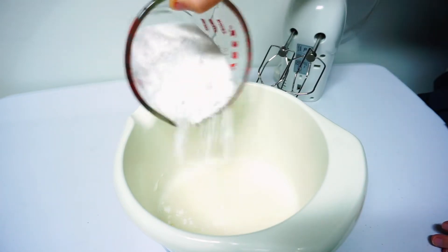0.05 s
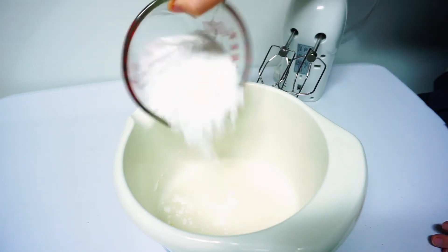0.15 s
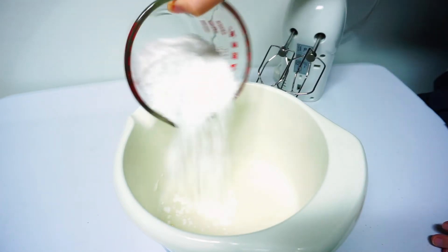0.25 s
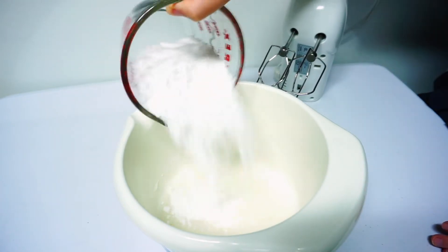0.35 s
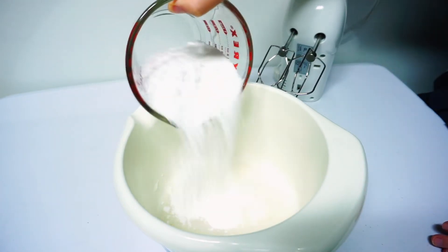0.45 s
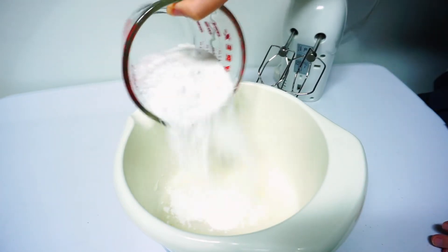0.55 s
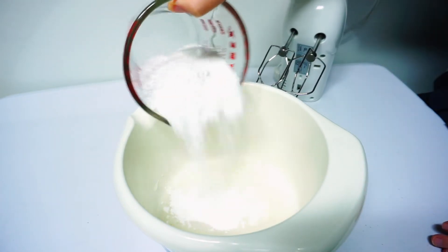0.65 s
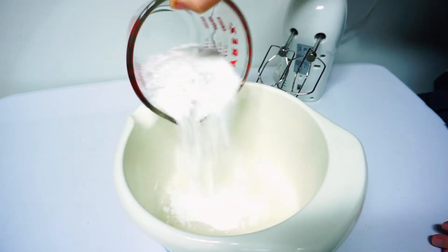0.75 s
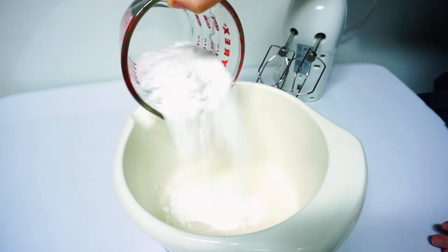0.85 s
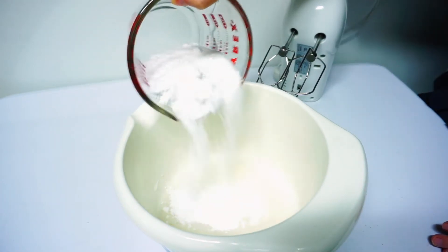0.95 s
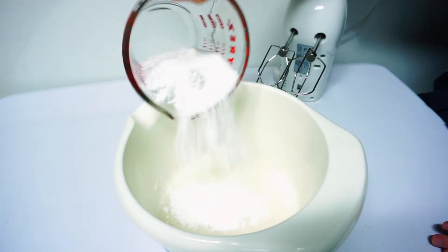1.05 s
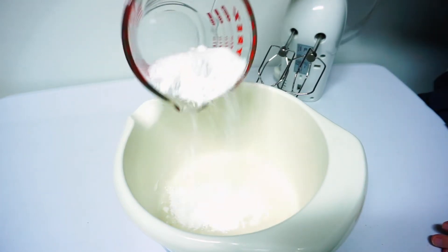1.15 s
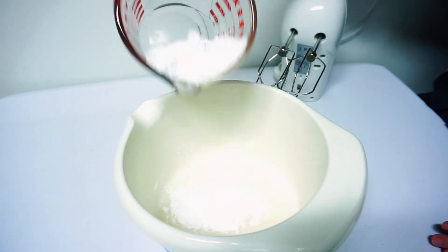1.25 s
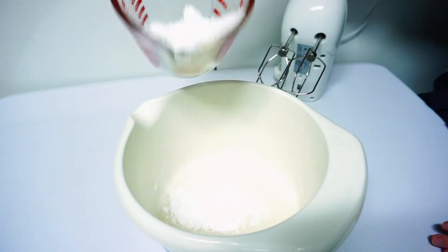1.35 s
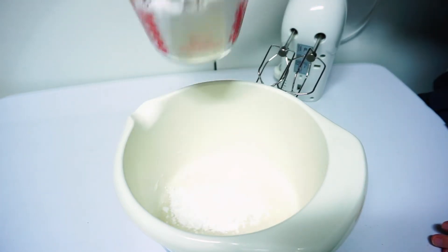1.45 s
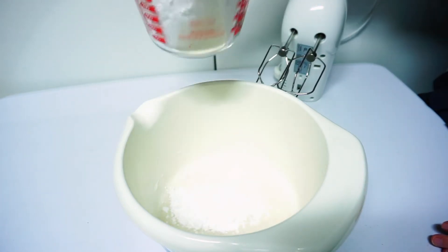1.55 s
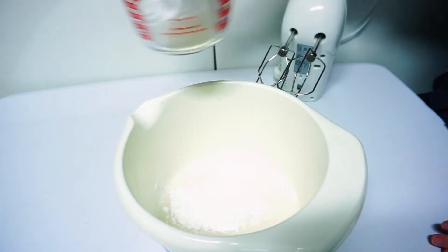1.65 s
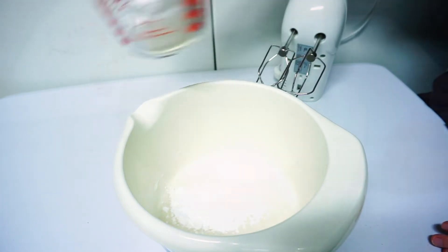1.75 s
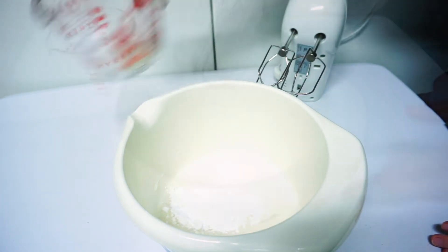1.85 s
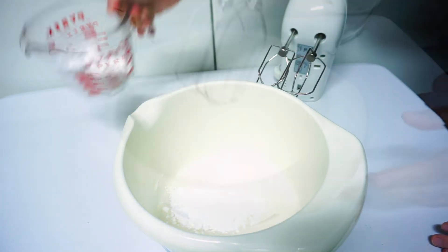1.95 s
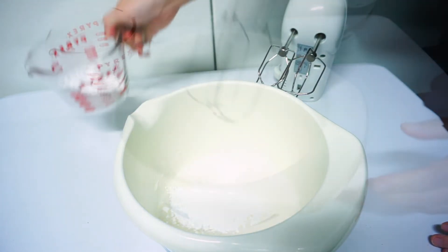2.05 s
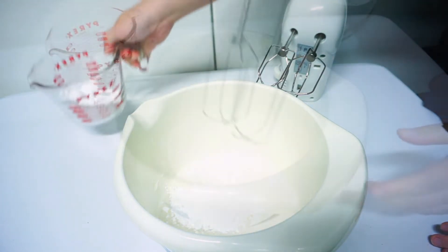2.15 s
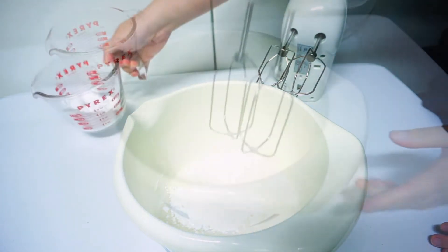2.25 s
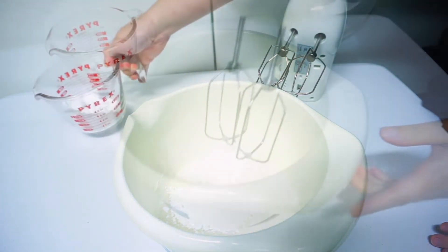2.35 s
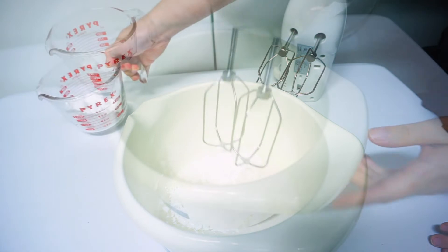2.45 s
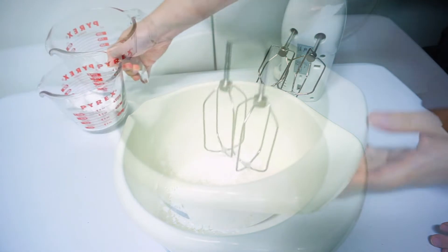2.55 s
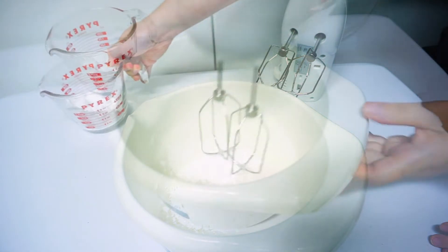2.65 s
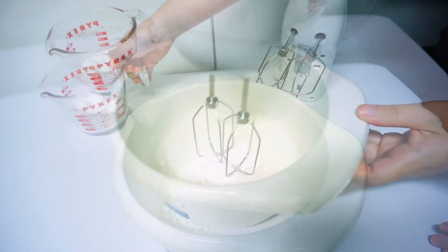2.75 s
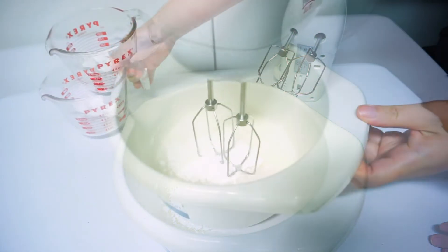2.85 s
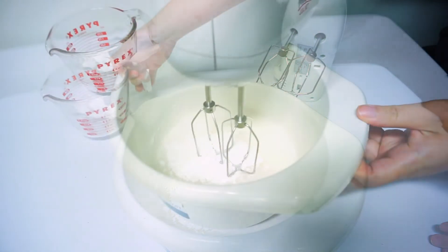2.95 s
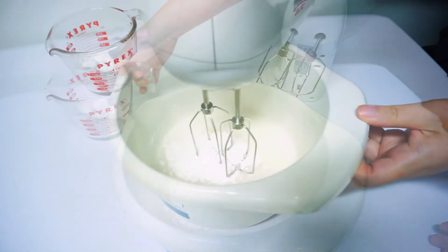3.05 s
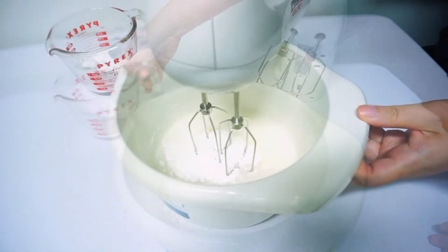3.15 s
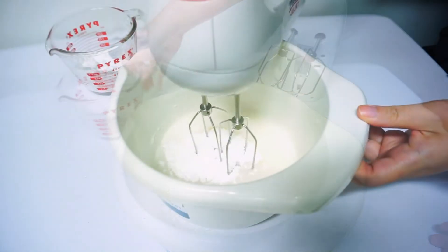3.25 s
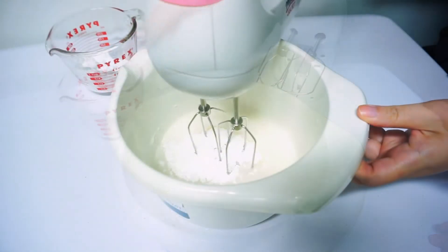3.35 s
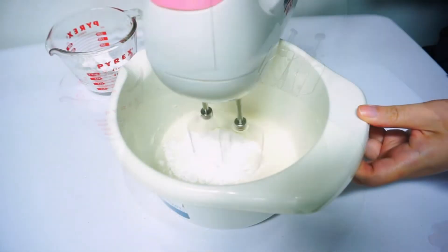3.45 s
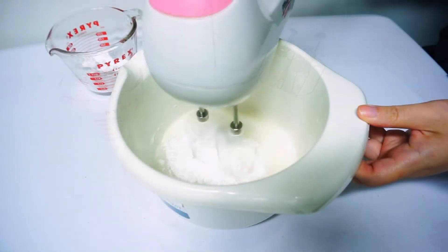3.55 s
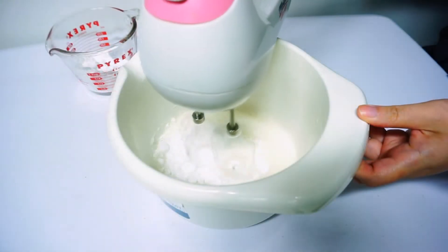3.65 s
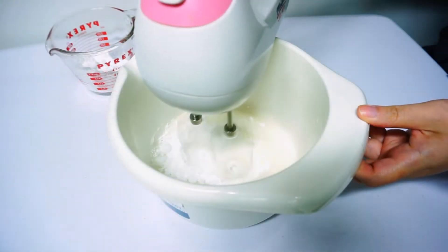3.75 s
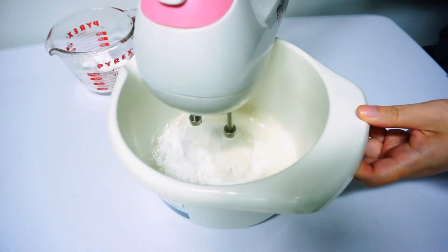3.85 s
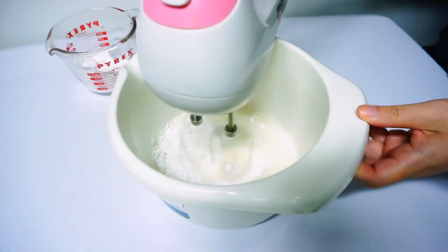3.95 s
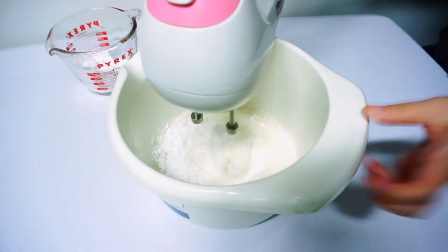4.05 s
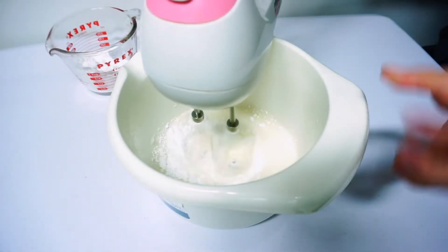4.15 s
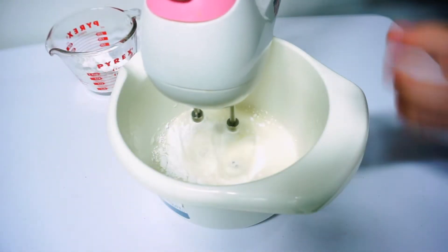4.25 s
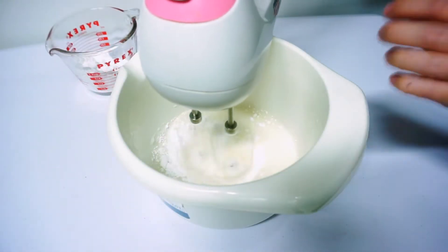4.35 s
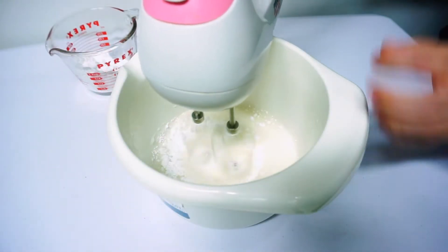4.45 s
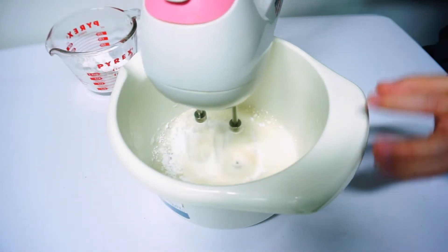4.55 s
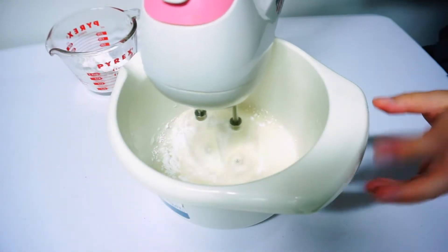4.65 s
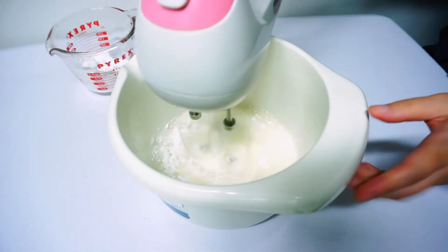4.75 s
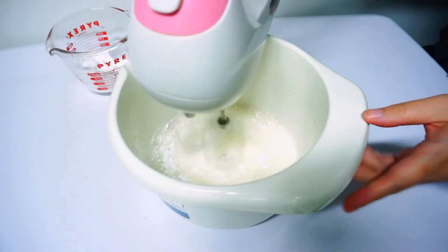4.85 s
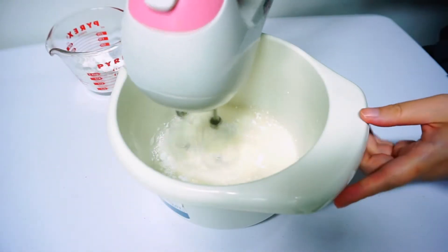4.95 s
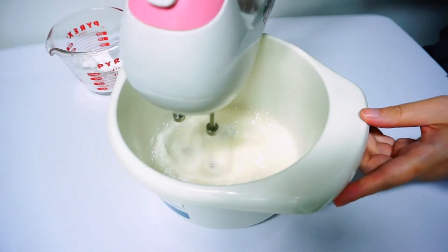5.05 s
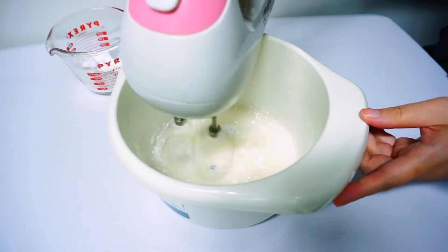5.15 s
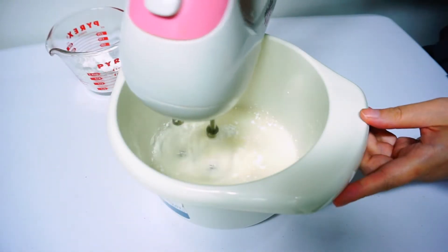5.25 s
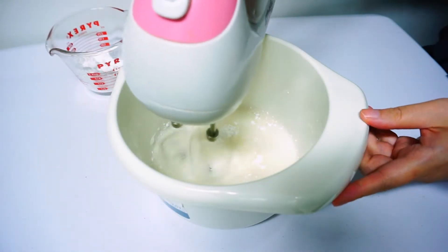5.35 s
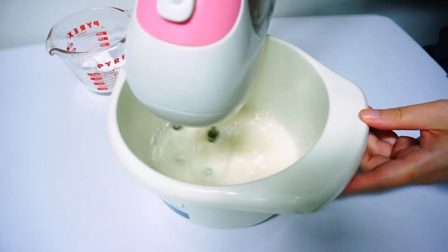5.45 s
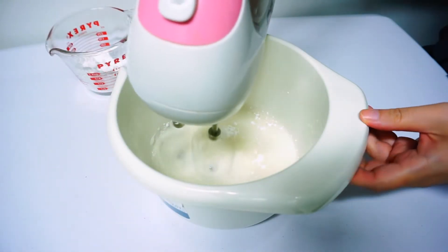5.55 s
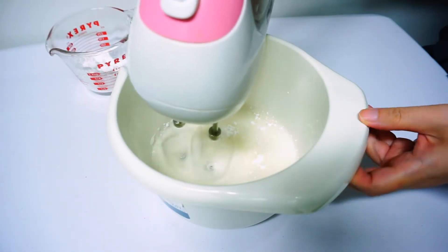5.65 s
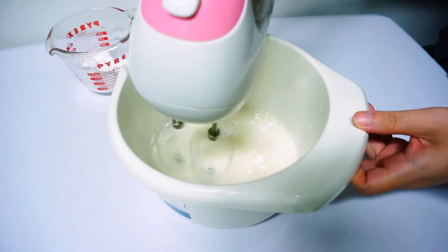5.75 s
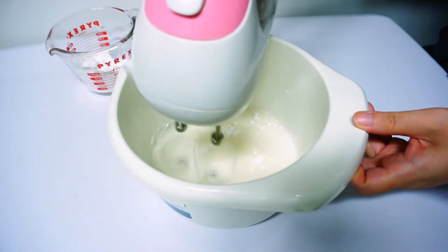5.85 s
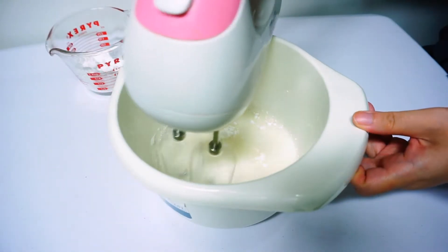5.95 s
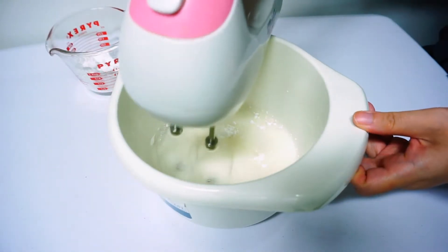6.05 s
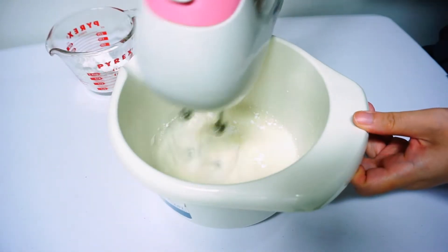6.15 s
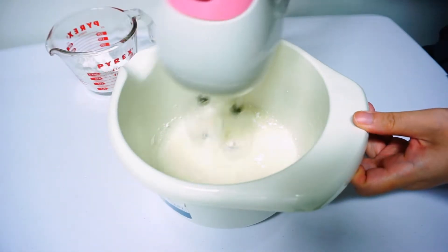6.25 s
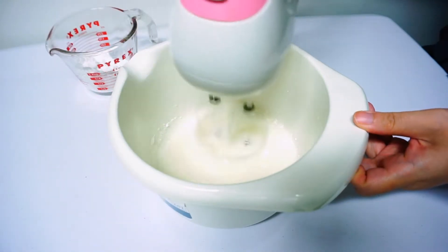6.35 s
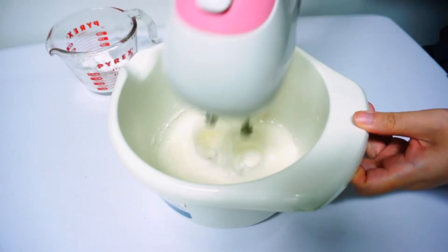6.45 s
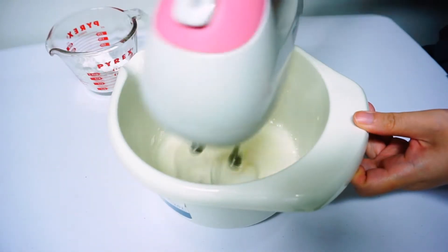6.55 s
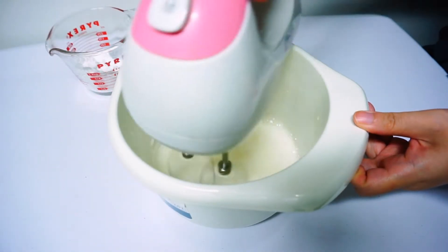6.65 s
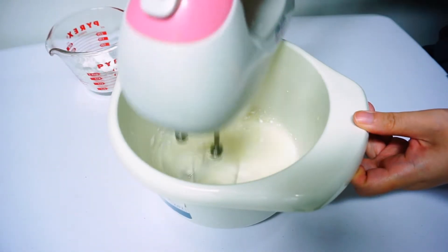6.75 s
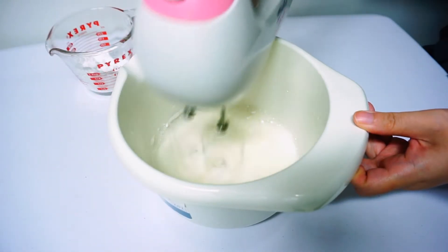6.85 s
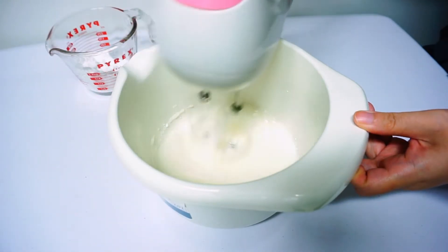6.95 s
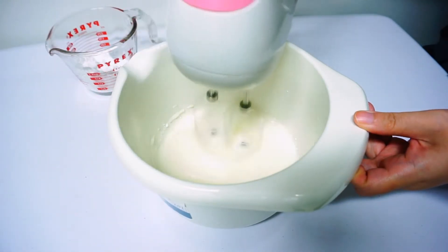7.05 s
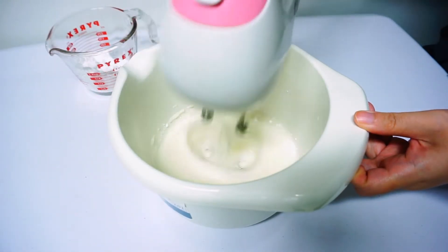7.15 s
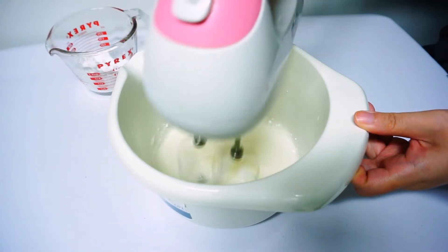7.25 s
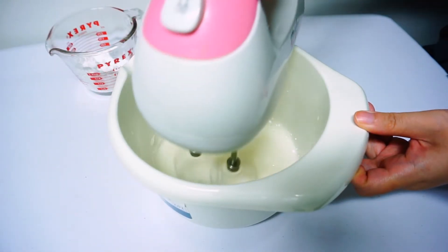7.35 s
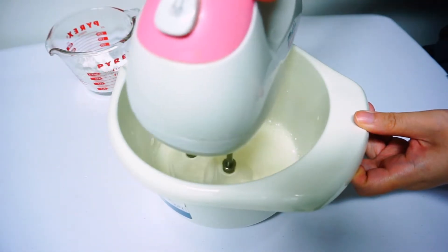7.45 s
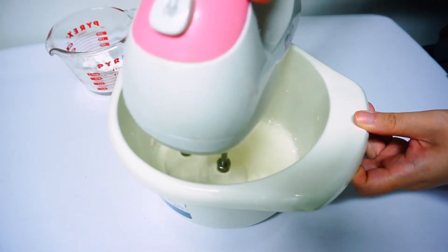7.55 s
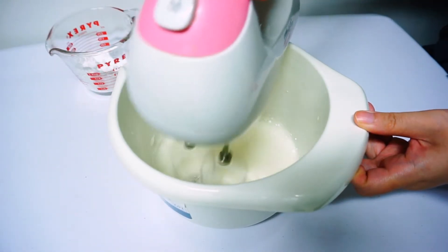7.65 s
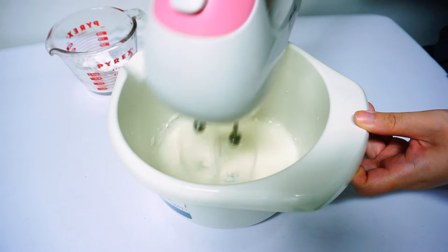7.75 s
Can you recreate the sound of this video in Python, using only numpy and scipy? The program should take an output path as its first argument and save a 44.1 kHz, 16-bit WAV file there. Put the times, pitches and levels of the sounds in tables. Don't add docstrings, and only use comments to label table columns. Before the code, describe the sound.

In a kitchen, powder is shaken from a glass jug in soft rustling bursts with sharp glassy knocks, then fades. After a quiet gap with faint bowl bumps, a hand mixer switches on with a jolt, its gritty motor whine rising fast and settling high. Beaters clack brightly on the ceramic bowl, each hit briefly ducking the motor. Close stereo microphone, little reverberation; the mixer is still running at the end.

```python
import sys
import numpy as np
from scipy import signal
from scipy.fft import rfft, irfft, next_fast_len
from scipy.io import wavfile
from scipy.ndimage import uniform_filter1d

SR = 44100
rng = np.random.default_rng(int(sys.argv[2]) if len(sys.argv) > 2 else 0)


def voltage_ratio(decibels):
    exponent = np.asarray(decibels, float) / 20
    return 10 ** exponent


def output_pcm(signal):
    pcm = np.clip(np.atleast_2d(signal).T, -1, 1) * 32767
    wavfile.write(sys.argv[1], SR, np.round(pcm).astype(np.int16))


N = 344862


def colour(x, points, share=1):
    size = next_fast_len(x.shape[-1])
    hz, db = np.transpose(points)
    bins_hz = np.fft.rfftfreq(size, 1 / SR)
    gain = voltage_ratio(share * np.interp(np.log(bins_hz + 1), np.log(hz), db))
    return irfft(rfft(x, size) * gain, size)[..., :x.shape[-1]]


def unit(x):
    return x / np.sqrt(np.mean(x ** 2))


def walk(rate):
    hold = int(SR / rate)
    held = rng.standard_normal(1500)[np.arange(N) // hold % 1500]
    return 1.3 * uniform_filter1d(uniform_filter1d(held, hold), hold)


def hiss(points, flicker_db, rate):
    return unit(colour(rng.standard_normal(N), points)) * voltage_ratio(flicker_db * walk(rate))


# (f/Hz, level/dB)
REFLECTIONS = [(30, -17.5), (200, -8), (500, -9), (1000, -5), (2500, -3), (4500, 3.5), (8000, 3),
               (11000, 3.5)]


def room(x, t60, wet_db):
    s = np.arange(int(0.6 * SR)) / SR
    decay = np.exp(-np.log(1000) * s / t60) * (s > 0.002)
    tail = rng.standard_normal((2, len(s))) * decay
    tail = colour(tail / np.sqrt(np.sum(tail ** 2) / 2), REFLECTIONS)
    return x + voltage_ratio(wet_db) * signal.fftconvolve(x[None], tail, axes=1)[:, :N]


def band(x, low_hz, high_hz):
    sos = signal.butter(3, [low_hz, high_hz], "band", fs=SR, output="sos")
    return unit(signal.sosfilt(sos, x))


def knocks(rows, ring_t60, body_t60, thump_t60, crack_t60, body_db, depth, crack_db, crack_growth):
    out, s = np.zeros(N + SR), np.arange(SR // 4) / SR

    def fade(t60):
        return np.exp(-np.log(1000) * s / t60) * (1 - np.exp(-s / 0.00026))

    for at, peak_db, ring_hz, thump_hz, thump_db in rows:
        noise = rng.standard_normal((3, len(s)))
        ring = np.sin(2 * np.pi * ring_hz * s) * fade(ring_t60)
        body = voltage_ratio(body_db) * band(noise[0], 0.52 * ring_hz, 2890) * fade(body_t60)
        boom = np.sin(2 * np.pi * thump_hz * s)
        boom += 0.83 * band(noise[1], depth * thump_hz, 1.31 * thump_hz)
        thump = voltage_ratio(thump_db) * boom * fade(thump_t60)
        crack = voltage_ratio(crack_db + crack_growth * peak_db) * band(noise[2], 4160, 13000) * fade(crack_t60)
        i = int(at * SR)
        out[i:i + len(s)] += voltage_ratio(peak_db) * (ring + body + thump) + crack
    return out[:N]


# (f/Hz, level/dB per Hz)
RUMBLE_TONE = [(20, -37), (60, -32), (120, -16), (160, -7.5), (220, 2.5), (300, -5), (420, -11.5),
               (700, -91)]
HOLLOW_TONE = [(180, -50.5), (300, -9), (312, -12), (441, -3.5), (481, -6.5), (667, -2), (825, -9),
               (1100, -24.5), (1430, -46.5), (2420, -120)]
RUSTLE_TONE = [(590, -39), (1000, -9.5), (1360, -1), (1700, -5.5), (1920, -4), (2040, -7), (2680, -4.5),
               (4200, -17), (5460, -48), (9240, -120)]
HISS_TONE = [(2350, -28), (4000, -7.5), (4360, -6.5), (6210, -2), (7370, -4.5), (9970, 0), (11200, -5),
             (14600, -34.5), (22000, -120)]
# start [dB], fade [dB/s], floor [dB],
# level within a slide [dB], share of a slide's brightness [dB per dB]
START_DB = (-75, -51.5, -51.5, -54.5)
FADE_DB_PER_S = (4, 7.94, 9.1, 8.5)
FLOOR_DB = (-82.5, -83.5, -76, -90)
SLIDE_LAYER_DB = (-25.5, -3.5, -0.5, -6.5)
SLIDE_BRIGHT_SHARE = (-1.3, -0.99, -0.35, .9)
# (t/s, length/s, level/dB, brightness/dB)
POWDER_SLIDES = [(0, 0.028, -56, -3), (0.106, 0.04, -40.5, 2.5), (.258, 0.12, -38, -0.5),
                 (.425, 0.099, -37.5, 1.5), (0.54, 0.18, -45.5, -1.5), (0.759, 0.1, -43, 2),
                 (0.922, 0.11, -44, 1), (1.067, 0.14, -46.5, 1), (1.32, 0.24, -64, 12),
                 (2.134, .055, -62, 7), (2.752, 0.095, -64, -10), (2.876, 0.11, -69, -9),
                 (3.051, .22, -63.5, -4)]


def pouring():
    s = np.arange(N) / SR
    fade_db = np.outer(FADE_DB_PER_S, s) + 18 * np.maximum(s - 2.78, 0)
    power = voltage_ratio(2 * (np.c_[list(START_DB)] - fade_db)) + voltage_ratio(2 * np.c_[list(FLOOR_DB)])
    for at, length, db, bright_db in POWDER_SLIDES:
        layer_db = db - 7 + np.array(SLIDE_LAYER_DB) + bright_db * np.array(SLIDE_BRIGHT_SHARE)
        swell = np.sin(np.pi * np.clip((s - at) / length, 0, 1) ** 0.61) ** 2
        power += voltage_ratio(2 * layer_db)[:, None] * swell
    rumble, hollow = hiss(RUMBLE_TONE, 2.8, 10), hiss(HOLLOW_TONE, 1.15, 21)
    rustle, fine = hiss(RUSTLE_TONE, 1.23, 90), hiss(HISS_TONE, 1.8, 90)
    layers = np.sqrt(power) * [rumble, hollow, rustle, fine]
    until_mixer = np.clip((3.45 - s) / 0.08, 0, 1)
    return room(until_mixer * layers.sum(0), 0.12, -1.1)


# (t/s, peak level/dB, ring f/Hz, thump f/Hz, thump over ring level/dB)
JUG_KNOCKS = [(0.1034, -40, 1590, 480, -6), (0.1106, -25, 1790, 730, -20.5), (0.1404, -25, 1550, 530, -2),
              (0.1471, -7, 2430, 694, -24), (0.1501, -13.5, 3180, 460, -17), (0.2853, -18, 1383, 478, -14),
              (0.3182, -23, 2270, 450, -14), (0.416, -32.5, 1320, 487, -4.5), (0.4474, -22, 1360, 458, -13),
              (0.6134, -41, 1930, 510, 1.5), (0.6444, -43, 1670, 700, -3), (0.7692, -40, 1550, 542, 3),
              (0.8614, -42, 1780, 555, -4), (0.9034, -48, 1710, 473, 7.5), (0.9542, -33.5, 2000, 490, -10),
              (1.1029, -36, 2520, 566, -3.5), (1.2211, -46, 2260, 477, -8), (1.2496, -46, 2380, 666, -8)]


def jug():
    blows = knocks(JUG_KNOCKS, ring_t60=0.012, body_t60=0.028, thump_t60=0.083, crack_t60=0.0055,
                   body_db=-9, depth=1.0, crack_db=-20, crack_growth=0.37)
    return room(blows, 0.3, -5)


# (t/s, peak level/dB, ring f/Hz, thump f/Hz, thump over ring level/dB)
BOWL_KNOCKS = [
    (2.468, -32, 1930, 415, -9.5),
    (2.4773, -31.5, 1130, 480, -13.5),
    (2.576, -48, 2060, 610, -7),
    (2.752, -39.5, 1240, 230, -2.5),
]


def bowl():
    blows = knocks(BOWL_KNOCKS, ring_t60=0.014, body_t60=0.088, thump_t60=0.17, crack_t60=0.026,
                   body_db=-4.5, depth=0.27, crack_db=-56.5, crack_growth=0.1)
    return room(blows, 0.45, -2.5)


# (t/s, peak
# level/dB, ring f/Hz, thump f/Hz, thump over ring level/dB)
BEATER_KNOCKS = [(3.3556, -30.5, 2600, 705, -10), (3.5498, -23.5, 3160, 700, -30),
                 (4.9452, -24, 3030, 600, -10), (5.0963, -20.5, 3000, 470, -22),
                 (5.3294, -24.5, 2536, 690, -16), (5.4665, -21, 2450, 496, -14.5),
                 (5.4774, -17.5, 2490, 580, -29), (5.7718, -19.5, 2400, 685, -28),
                 (6.0452, -21, 2360, 540, -18), (6.6164, -17.5, 3080, 634, -17),
                 (6.6224, -16, 2990, 534, -22)]
BEATER_THUDS = [
    (5.948, -44, 1198, 486, 12.4),
    (5.962, -43, 1200, 523, 15.8),
    (5.977, -40.5, 1200, 272, 13),
]


def beaters():
    blows = knocks(BEATER_KNOCKS + BEATER_THUDS, ring_t60=0.015, body_t60=0.027, thump_t60=0.073,
                   crack_t60=0.0092, body_db=-8, depth=0.72, crack_db=-19.5, crack_growth=0.45)
    return room(blows, 0.11, -4)


# (t/s, depth level/dB, fall/s, recovery/s)
GAIN_DROPS = [
    (3.76, 7, .1, 0.65),
    (4.945, 6.5, 0.0088, 0.071),
    (5.333, 4.5, .004, 0.048),
    (5.478, 9.5, 0.007, 0.06),
    (6.619, 9.5, 0.0062, 0.14),
]


def gain_control():
    s = np.arange(N) / SR
    gain_db = np.zeros(N)
    for at, depth_db, fall, back in GAIN_DROPS:
        recovery = np.exp(-np.maximum(s - at - fall, 0) / back)
        gain_db -= depth_db * np.clip((s - at) / fall, 0, 1) * recovery
    return gain_db


def tones(rows, turn, mains, wander_db, rate):
    out = np.zeros(N)
    for k, m, db in rows:
        level = voltage_ratio(db + 0.5 + wander_db * walk(rate))
        out += level * np.sin(k * turn + m * mains + rng.uniform(0, 2 * np.pi))
    return out


# (f/Hz, level/dB per Hz)
AIR_TONE = [(2240, -38), (3800, -3), (4140, -4), (4700, -4), (6170, -0.5), (6900, 3.5), (7520, 1.5),
            (10600, 3), (11200, -3.5), (14600, -54), (22000, -120)]


def fan_air(mains):
    return hiss(AIR_TONE, 0.6, 40) * (1 + 0.2 * np.cos(2 * mains))


# (f/Hz, level/dB per Hz)
GEAR_TONE = [(24, -75), (40, -61), (254, -18.5), (292, -16), (383, -16.5), (474, -3.5), (623, -5.5),
             (834, 1), (956, -4.5), (1280, -2), (1680, -4.5), (2080, 4), (2300, -3), (3660, -10.5),
             (4200, -35), (5460, -73), (9240, -120)]
# (f/Hz, width f/Hz, level/dB)
HOUSING_MODES = [(513, 81, 1.5), (900, 64, 0.5), (1235, 112, 6.5), (1515, 99, 6), (1772, 160, 2),
                 (1940, 67, 0.5), (2763, 270, 6)]
# (shaft multiple, level/dB)
SHAFT_ORDERS = [(1, -16), (2, -21), (4, -22), (5, -14), (6, -4), (7, -6.5), (8, -10.5), (9, -9.5),
                (10, -13.5), (11, -12), (13, -15.5)]
# (shaft multiple, mains multiple, level/dB, power of speed)
TORQUE_BEATS = [(1, 2, -14.5, 8.5), (1, 4, -16, -1.5), (2, 2, -7.5, 3.5), (2, 4, -9, -2.5), (3, 2, -11, 11),
                (3, 4, -8.5, 4), (4, 2, -12, 1.5), (6, 4, -17.5, 3)]


def gears(speed, turn, mains):
    hz = np.geomspace(30, 12000, 600)
    housing_db = sum(db / (1 + (2 * (hz - f) / width) ** 2) for f, width, db in HOUSING_MODES)
    housing = np.c_[hz, housing_db]
    throb = (1 + 0.25 * np.cos(turn)) * (1 + (0.9 - 0.77 * speed) * np.cos(2 * mains))
    clatter = voltage_ratio(6) * unit(colour(hiss(GEAR_TONE, 0.72, 40) * throb, housing))
    orders = speed ** 5.3 * tones([(k, 0, db) for k, db in SHAFT_ORDERS], turn, mains, 2.3, 3.793)
    for k, m, db, power in TORQUE_BEATS:
        orders += speed ** power * tones([(k, m, db)], turn, mains, 2.264, 5)
    loading = np.minimum(speed / 0.75, 1) ** 5
    return clatter + voltage_ratio(-1.5) * loading * colour(orders, housing)


# (shaft multiple, level/dB)
BRUSH_ORDERS = [(14, -24), (16, -24), (18, -20), (19, -20), (20, -21), (21, -20), (22, -16), (23, -19),
                (25, -18), (26, -18), (27, -19), (28, -21), (29, -21), (30, -20), (32, -15), (33, -17),
                (34, -17), (35, -17)]


def brushes(speed, turn, mains):
    return tones([(k, 0, db) for k, db in BRUSH_ORDERS], turn, mains, 2.5, 6) * voltage_ratio(7 * (1 - speed))


# (shaft multiple, mains multiple, level/dB, fade with speed/dB)
WHINE_LINES = [(12, 0, 0.5, 0), (12, 2, -1.5, 21.5), (12, 4, -2, 28), (12, -2, -11, 12), (24, 0, -2, 17.5),
               (24, 2, -2, 18), (24, -2, -7.5, 19), (36, 0, -18, -15.5)]
# (f/Hz, level/dB)
SHELL_TONE = [(850, 23.5), (1400, 17), (1950, 18.5), (2400, 12), (2640, 14.5), (2760, 26), (2880, 14.5),
              (3050, 2), (3250, 4.5), (3700, 0), (4200, -12.5), (5200, -8), (6400, -1.5), (10000, 3),
              (11000, -8.5)]
# (t/s, level/dB)
TILT_SWELL = [
    (3.38, -1),
    (3.75, 4),
    (4.1, 3.5),
    (4.9, 4.5),
    (5.2, -6.5),
    (5.9, -1),
    (6.3, -3),
    (6.7, 1),
    (7.8, 3.5),
]


def slot_whine(on, speed, turn, mains):
    whine = np.zeros(N)
    for k, m, db, fade_db in WHINE_LINES:
        whine += voltage_ratio(-fade_db * speed ** 4) * tones([(k, m, db)], turn, mains, 0.9, 8)
    at, tilt_db = np.transpose(TILT_SWELL)
    tilt = voltage_ratio(np.interp(np.arange(N) / SR, at, tilt_db))
    return tilt * colour(on * whine, SHELL_TONE)


def mixer():
    s = np.maximum(np.arange(N) / SR - 3.374, 0)
    slot_hz = 3440 + 55 * s - 1800 * np.exp(-s / 0.168) - 1240 * np.exp(-s / 0.62)
    on = np.clip(s / 0.00424, 0, 1)
    turn = 2 * np.pi * np.cumsum(slot_hz * on) / SR / 12
    mains = 2 * np.pi * 60 * np.arange(N) / SR
    speed = slot_hz / slot_hz[-1]
    swell_db = -11.5 * np.exp(-s / 0.69)
    level_db = -43 + swell_db + gain_control() + 0.3 * 20 * np.log10(speed)
    gear_db = 7 + 18 * np.exp(-s / 0.028) + 0.9 * walk(3.055)
    mechanical = voltage_ratio(gear_db) * gears(speed, turn, mains) + fan_air(mains)
    electrical = brushes(speed, turn, mains) + slot_whine(on, speed, turn, mains)
    body = room(on * mechanical, 0.27, -2.1) + room(on * electrical, 0.05, -5)
    return voltage_ratio(level_db - 1) * on * body


def scene():
    blows = colour(jug() + bowl() + beaters(), [(40, -21), (170, -10.5), (400, -1), (11000, -0.5)])
    return pouring() + blows + mixer()


def band_limit(x):
    return signal.sosfilt(signal.butter(12, 12240, fs=SR, output="sos"), x)


# (f/Hz, level/dB)
STEREO_BALANCE = [(60, -2.5), (110, 5), (190, -2.5), (350, 2), (620, -1.5), (1120, -3), (2010, -2.5),
                  (3610, -4), (6480, -0.5), (11600, -1)]
# (f/Hz, level/dB)
MIC_TONE = [(20, -0.5), (150, -0.5), (350, 0), (11000, -2), (11250, -37.5), (12000, -49.5)]


def record(dry):
    left = colour(dry[0], STEREO_BALANCE, share=0.25)
    right = colour(dry[1], STEREO_BALANCE, share=-0.65)
    return band_limit(colour(np.array([left, right]), MIC_TONE))


dry = scene()
out = record(dry)
output_pcm(out)
```